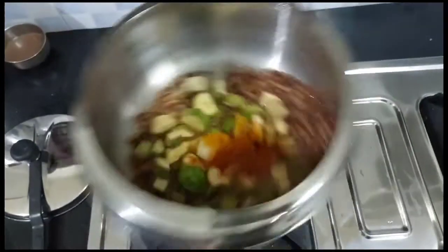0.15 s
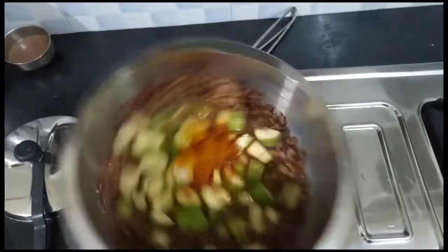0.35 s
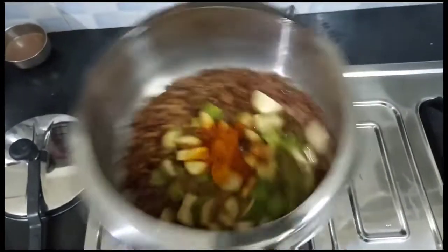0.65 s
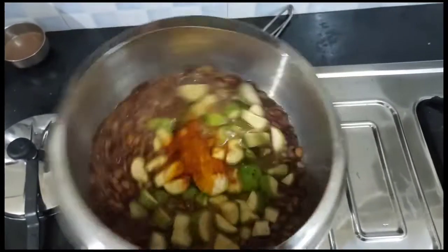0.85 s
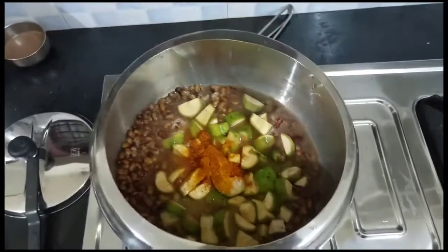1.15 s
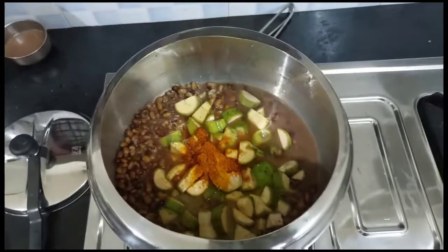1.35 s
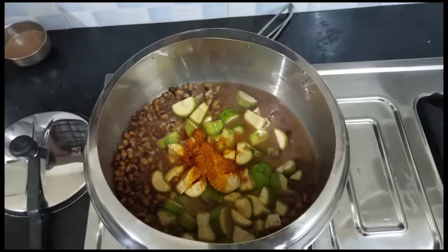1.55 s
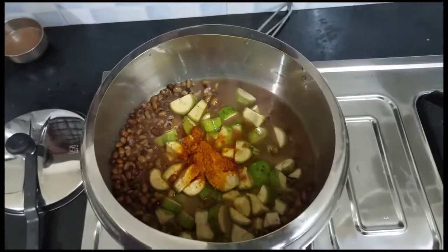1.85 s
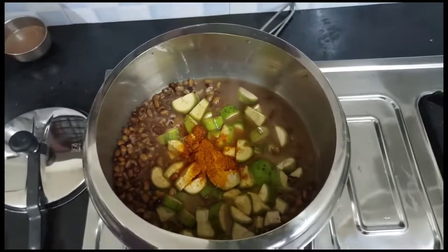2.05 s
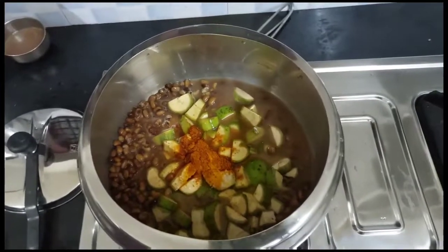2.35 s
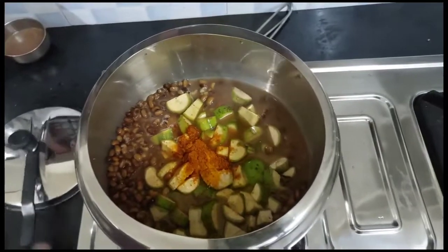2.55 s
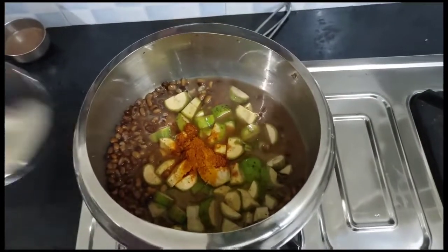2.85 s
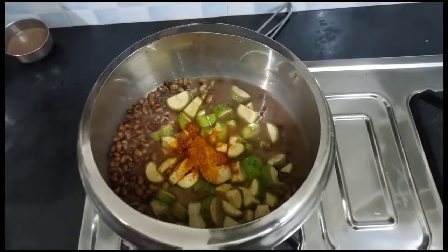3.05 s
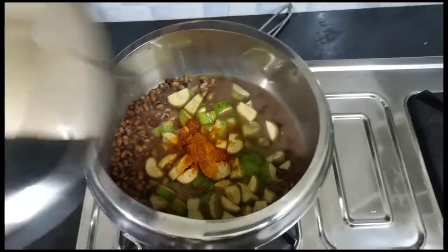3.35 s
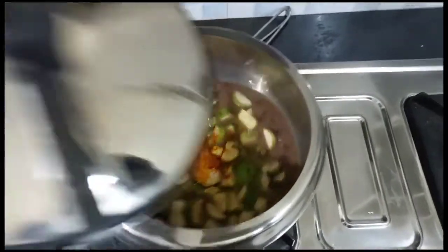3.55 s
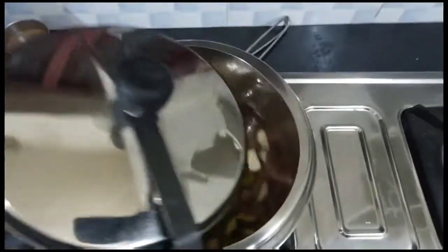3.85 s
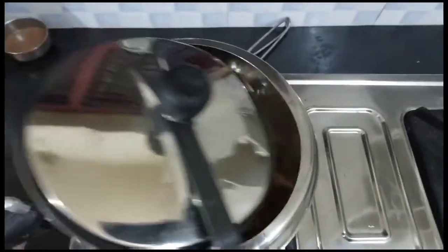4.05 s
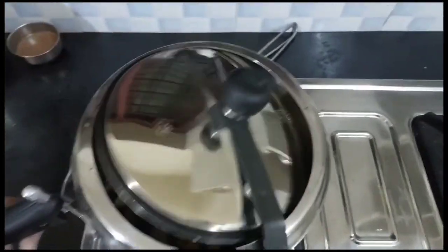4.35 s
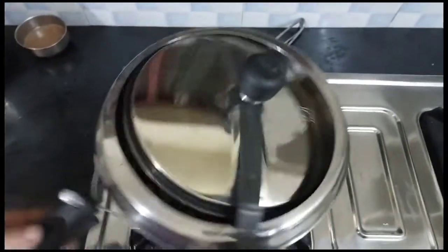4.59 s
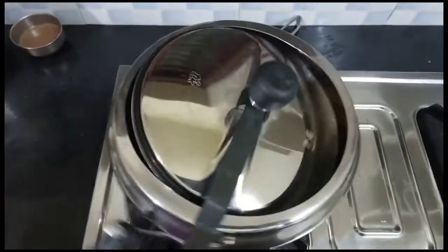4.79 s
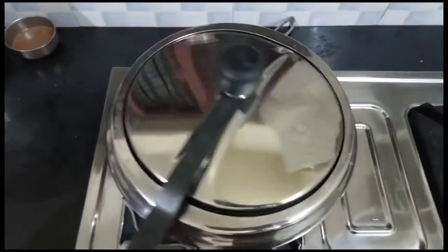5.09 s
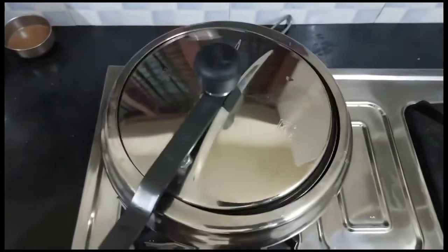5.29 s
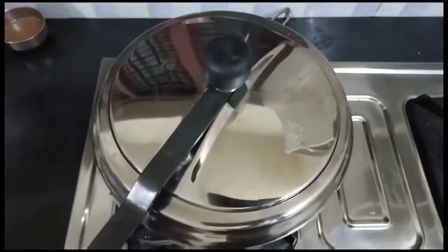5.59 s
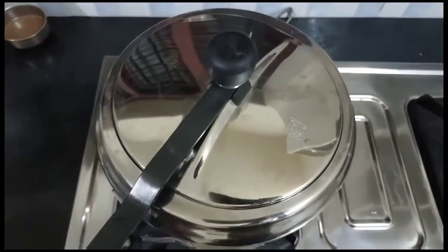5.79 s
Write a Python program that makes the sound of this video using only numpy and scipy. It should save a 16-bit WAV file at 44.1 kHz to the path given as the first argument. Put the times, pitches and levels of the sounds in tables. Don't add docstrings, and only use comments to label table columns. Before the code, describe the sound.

Close kitchen metal sounds: soft bean swish, heavy pot knocks, bright lid scraping, a short high squeak, then hard ringing clatters as the lid locks.

```python
import sys
import numpy as np
from scipy import signal
from scipy.fft import rfft, irfft
from scipy.io import wavfile
from scipy.ndimage import uniform_filter1d

SR = 44100
rng = np.random.default_rng(int(sys.argv[2]) if len(sys.argv) > 2 else 0)


def natural_amplitude(level_db):
    exponent = np.asarray(level_db, float) / 20
    return 10 ** exponent


def waveform_to_disk(signal):
    frames = np.transpose(np.atleast_2d(signal))
    scaled = np.clip(frames, -1, 1) * 32767
    samples = np.round(scaled).astype(np.int16)
    wavfile.write(sys.argv[1], SR, samples)


N = 261326

BANDS_HZ = [130, 500, 2000, 7500]
BOOM_PER_WEIGHT = 0.93


def read(points, hz):
    f, value = np.transpose(points)
    return np.interp(np.log(hz + 1), np.log(f + 1), value)


def evened(x):
    return x / np.sqrt(np.mean(x ** 2) + 1e-20)


def shares(hz):
    return np.array([read(list(zip(BANDS_HZ, row)), hz) for row in np.eye(len(BANDS_HZ))])


def left_port(hz):
    # (frequency [Hz], level [dB])
    louder_left = [(60, -4.5), (240, 1.5), (950, 1), (3770, -6), (15000, 1)]
    right_lag = 11
    return natural_amplitude(read(louder_left, hz)) * np.exp(2j * np.pi * hz * right_lag / SR)


def port_noise(colour, size):
    # (frequency [Hz], likeness [0 to 1])
    likeness = [(60, 0.94), (400, 1), (1300, 0.11), (5000, 0.23), (15000, 0.2)]
    hz = np.fft.rfftfreq(size, 1 / SR)
    right, other = rfft(rng.standard_normal((2, size)))
    same = np.clip(read(likeness, hz), 0, 1)
    left = (same * right + np.sqrt(1 - same ** 2) * other) * left_port(hz)
    return np.array([left, right]) * natural_amplitude(read(colour, hz)), hz


def pressure(t, contact, voice):
    blow_boom_db, boom_db, sizzle_db, low_fade, sizzle_fade = voice
    power = np.zeros((len(BANDS_HZ), len(t)))
    for at, rise, db, fade_db, weight_db in contact:
        tone_db = np.array([boom_db + BOOM_PER_WEIGHT * weight_db, weight_db, 0, sizzle_db])
        fading = abs(fade_db) * np.maximum(t - at - rise, 0)
        slack_db = np.outer([low_fade, low_fade, 1, sizzle_fade], fading)
        build_up = np.clip((t - at) / abs(rise), 0, 1)
        power += (build_up * natural_amplitude(db + tone_db[:, None] - slack_db)) ** 2
    return np.sqrt(power)


def chatter(count, per_s, spread_db):
    strength = natural_amplitude(spread_db * np.minimum(rng.exponential(1, count), 2.6))
    size = strength * rng.choice([-1, 1], count)
    return evened(size * (rng.random(count) < per_s / SR))


def shimmer(drive, colour, t60, crack, bunch_db):
    count = drive.shape[2]
    age = np.arange(10240) / SR
    cracking = crack * (natural_amplitude(-60 * age / 0.015) + natural_amplitude(-60 * age / 0.0013))
    out = np.zeros((2, count))
    spot = rng.integers(0, 3, count)
    for k, here in np.ndindex(len(BANDS_HZ), 3):
        z, hz = port_noise(colour, size=len(age))
        bunches = evened(uniform_filter1d(rng.standard_normal(len(hz)), size=18))
        z = z * natural_amplitude(bunch_db * bunches)
        rise = 1 - np.exp(-age * BANDS_HZ[k])
        tail = irfft(z * shares(hz)[k]) * (natural_amplitude(-60 * age / t60[k]) + cracking) * rise
        tail = tail / np.linalg.norm(tail[1])
        out += signal.fftconvolve(drive[:, k] * (spot == here), tail, axes=1)[:, :count]
    return out


def clear_modes(drive, modes, ring_db):
    count = drive.shape[2]
    place = natural_amplitude(3.37 * rng.standard_normal(count)) * rng.choice([-1, 1], count)
    both = np.array([place, place[::-1]])
    out = np.zeros((2, count))
    for hz, db, t60 in modes:
        pole = np.exp(2j * np.pi * hz / SR - np.log(1000) / (min(t60, .9) * SR))
        same = np.exp(-hz / 2500)
        mixing = np.array([[same, np.sqrt(1 - same ** 2)], [1, 0]])
        push = np.tensordot(shares(hz), drive, (0, 1))
        push = push * np.roll(mixing @ both, rng.integers(count), axis=1)
        turn = np.array([[left_port(hz) * np.exp(1j * rng.normal(0, hz / 3000))], [1]])
        ringing = (turn * signal.lfilter([1], [1, -pole], push)).imag
        out += natural_amplitude(ring_db + db) * np.sqrt(1 - abs(pole) ** 2) * ringing
    return out


def struck_object(span, voice, blows, contact, colour, modes, t60, blow_db, contact_db, ring_db,
                  per_s, spread_db, crack, bunch_db):
    start = round(span[0] * SR)
    count = min(round(span[1] * SR) + SR // 2, N) - start
    t = (start + np.arange(count)) / SR
    touching = t < span[1]
    rub = pressure(t, contact, voice) * touching * chatter(count, per_s, spread_db)
    drive = natural_amplitude(contact_db) * np.array([rub, rub])
    for at, db, weight, sharp, pan in blows:
        tone_db = np.array([voice[0] + BOOM_PER_WEIGHT * weight, weight, 0, sharp])
        force = natural_amplitude(blow_db + db + tone_db)
        drive[:, :, max(round(at * SR) - start, 0)] += np.outer(natural_amplitude([pan / 2, -pan / 2]), force)
    out = np.zeros((2, N))
    out[:, start:start + count] = shimmer(drive, colour, t60, crack, bunch_db)
    out[:, start:start + count] += clear_modes(drive, modes, ring_db)
    return out


def rings(rows):
    out = np.zeros((2, N))
    age = np.arange(SR // 2) / SR
    for (at, hz, db, t60), chance in zip(rows, rng.random((len(rows), 7))):
        apart_hz = (chance[1:4, None] - .5) * (16 + hz * 0.0306)
        beat = 1 + 0.59 * np.exp(2j * np.pi * (apart_hz * age + chance[4:, None])).sum(0)
        fade = natural_amplitude(db - 60 * age / t60) * (1 - np.exp(-age / 0.0016))
        tone = fade * beat * np.exp(2j * np.pi * hz * age)
        turn = np.array([[left_port(hz) * np.exp(1j * (chance[0] - .5) * hz / 900)], [1]])
        part = out[:, round(at * SR):][:, :len(age)]
        part += (turn * tone).imag[:, :part.shape[1]]
    return out


def kitchen_hush():
    # (frequency [Hz], level [dB per Hz])
    hush_colour = [(12, -63), (24, -6), (107, -2.5), (158, -21.5), (262, -17.5), (500, -36), (2530, -30.5),
                   (16000, -30.5)]
    noise = irfft(port_noise(hush_colour, size=2 ** 18)[0])[:, :N]
    return natural_amplitude(-72) * evened(noise)


def swirled_beans():
    # (time [s], force [dB], weight [dB], sharpness [dB], left-right [dB])
    blows = [
        (0.139, -52, -24, 10, 2),
        (0.203, -49.5, -27, 6, -4),
        (0.5527, -61.5, -21, 22, 4),
        (0.769, -70, -9, 16, -9),
        (0.81, -66, 3, 17, -3),
    ]
    # (start [s], build-up [s], peak [dB], fade [dB per s], weight [dB])
    contact = [
        (0.0, 0.00053, -71, 30, -3.5),
        (.12, 0.085, -72.5, 94, -27),
        (.36, .14, -71.5, 30, -6.5),
        (.78, 0.12, -77, 90, -10),
        (.98, 0.03, -77.5, 293, -8),
    ]
    # (frequency [Hz], level [dB per Hz])
    colour = [(24, -34), (40, 12), (364, -27.5), (1170, -17), (1490, -21), (1730, -17), (2450, -15),
              (4910, -18), (15000, -43)]
    # (frequency [Hz], level [dB], 60 dB decay time [s])
    modes = [(4630, -10, .02)]
    # (blow boom [dB], scrape boom [dB], scrape sizzle [dB], fade in lows [share], in sizzle [share])
    voice = (-3, 3.5, 11.5, 0.7, 1.1)
    # (time [s], frequency [Hz], level [dB], 60 dB decay time [s])
    lone_rings = [(.14, 4880, -60, 0.2), (.14, 4540, -49, 0.044), (.14, 5170, -56, .04),
                  (.246, 1157, -66.5, 0.21), (.246, 1720, -57, 0.33), (.66, 1180, -76, .3),
                  (.72, 1280, -77, 1.4), (.9, 2070, -76, 0.87), (.905, 3800, -62, 0.12),
                  (.94, 860, -79, 0.54), (.1, 1260, -75, 1.2)]
    return rings(lone_rings) + struck_object(
        (0, 1.271), voice, blows, contact, colour, modes, t60=[0.042, 0.34, 0.6, 0.13],
        blow_db=12, contact_db=-1, ring_db=-12, per_s=3000, spread_db=3.0, crack=2.5, bunch_db=3.0)


def landing_pot():
    # (time [s], force [dB], weight [dB], sharpness [dB], left-right [dB])
    blows = [(1.2933, -27, -1, -8, 0), (1.4184, -19, -7, -8, 3.5), (1.49, -25, -2.5, -11, 0),
             (1.544, -21.5, -3.5, -3.5, 0), (1.7566, -47.5, 16.5, -35, 0.5), (1.8707, -25.5, -3, -7.5, 1.5),
             (1.9295, -27.5, -5, -8, 0), (1.574, -25.5, -4, -10, -1), (2.065, -51.5, 12.5, 8, 1),
             (2.09, -56.5, -4, 14, 1), (2.11, -55.5, 6, 2, -3.5)]
    # (start [s], build-up [s], peak [dB], fade [dB per s], weight [dB])
    contact = [
        (1.29, 0.019, -26, 175, -1),
        (1.409, 0.0039, -26.5, 67, -1),
        (1.45, 0.078, -35, 97, -5),
        (1.864, 0.022, -31, 96, -2),
        (2.1, 0.14, -58, 400, 3.5),
        (2.28, 0.094, -61.5, 60, -9),
    ]
    # (frequency [Hz], level [dB per Hz])
    colour = [(24, -34), (40, -11), (160, -15), (239, -3), (454, -9.5), (888, -7), (2170, -6), (4560, -16),
              (15000, -49.5)]
    # (frequency [Hz], level [dB], 60 dB decay time [s])
    modes = [(102, -0.5, 1), (227.4, 3.5, 0.2), (281.6, 0.5, 0.19), (332, 2, 0.13), (409, -3, 0.7),
             (670, -2, 0.12), (886, -2.5, 0.12), (2387, -1.5, 0.046)]
    # (blow boom [dB], scrape boom [dB], scrape sizzle [dB], fade in lows [share], in sizzle [share])
    voice = (-13, -4.5, -4.5, 0.76, 1.05)
    # (time [s], frequency [Hz], level [dB], 60 dB decay time [s])
    lone_rings = [(1.294, 925, -54, .4), (1.49, 95.3, -36.5, 1.3), (1.87, 289, -37.5, 0.74),
                  (2.31, 4500, -73, 0.3), (2.37, 1090, -73, 0.95), (2.39, 4020, -71, 0.45),
                  (2.41, 4130, -70, .5), (2.46, 4230, -73, 0.58), (3.95, 671, -38, 0.27),
                  (5.546, 97.5, -29, 0.81), (5.546, 187.7, -30.5, 0.36)]
    return rings(lone_rings) + struck_object(
        (1.29, 2.5), voice, blows, contact, colour, modes, t60=[0.26, 0.3, 0.45, 0.36],
        blow_db=22, contact_db=-4, ring_db=-7, per_s=400, spread_db=4.5, crack=.9, bunch_db=2.5)


def dragged_lid():
    # (time [s], force [dB], weight [dB], sharpness [dB], left-right [dB])
    blows = [
        (2.5402, -36, -18, -24, -4),
        (2.628, -34, -8, -10, 5),
        (2.912, -52, -21, 4, 0),
        (3.072, -41, -18, -8.5, 3),
        (2.7828, -40, -3, -30, -20),
        (2.943, -44.5, -17, 0, -1),
        (3.053, -39, -22, -8, 2),
        (3.15, -31, -17, -1, 1),
        (3.2389, -38.5, -31, -0.5, 3),
        (3.2558, -44, -31, -3, -9),
    ]
    # (start [s], build-up [s], peak [dB], fade [dB per s], weight [dB])
    contact = [
        (2.524, 0.017, -40.5, 22, -11.5),
        (2.589, 0.059, -32, 100, -5.5),
        (2.75, 0.05, -47, 240, -10),
        (2.9, 0.08, -51.5, 370, -22),
        (3.045, 0.022, -48.5, 480, -15),
        (3.14, 0.032, -48, 180, -30),
        (3.24, 0.084, -54, 540, -5),
        (3.43, 0.041, -69.5, 10, 5.5),
    ]
    # (frequency [Hz], level [dB per Hz])
    colour = [(35, -40), (80, -28), (400, -24.5), (900, -18), (1450, -7), (2550, 3.5), (3150, -1),
              (4800, 0), (5800, -7.5), (15000, -26)]
    # (frequency [Hz], level [dB], 60 dB decay time [s])
    modes = [(192, -12, .3), (1180, -3, .2), (1495, 0, .25), (1955, -1, .2), (2450, 0, .1), (2620, -2, .12),
             (2890, -3, .14), (3470, -3, .15), (3880, -4, .12), (4320, -5, .1), (4780, -2, .08),
             (5240, -6, .12)]
    # (blow boom [dB], scrape boom [dB], scrape sizzle [dB], fade in lows [share], in sizzle [share])
    voice = (-33, -12, 5.5, 0.95, 2)
    # (time [s], frequency [Hz], level [dB], 60 dB decay time [s])
    lone_rings = [(2.54, 1393, -46, 0.39), (2.63, 396.5, -39, 0.13), (2.645, 420, -38.5, .15),
                  (2.545, 470, -57, .3), (2.58, 400, -51.5, 0.27), (3.06, 640, -72, 0.51),
                  (3.32, 510, -62, 0.27), (3.152, 2700, -36, .06), (3.152, 1050, -53.5, 0.28),
                  (2.64, 190, -46.5, .4), (3.07, 1100, -54, 0.2), (3.054, 2600, -44, 0.1),
                  (3.054, 4900, -46, 0.14), (3.24, 2400, -48.5, 0.36), (3.24, 4800, -47, 0.13)]
    return rings(lone_rings) + struck_object(
        (2.52, 3.48), voice, blows, contact, colour, modes, t60=[0.12, 0.56, 0.39, 0.27],
        blow_db=21, contact_db=-3, ring_db=-5, per_s=1300, spread_db=3.5, crack=2.1, bunch_db=3.0)


def air_under_lid():
    # (time [s], frequency [Hz], level [dB])
    air_pocket = [
        (2.659, 473, -57),
        (2.711, 579, -48),
        (2.773, 647, -46.5),
        (2.86, 702, -53),
        (2.98, 706, -89),
    ]
    s, hz, db = np.transpose(air_pocket)
    t = np.arange(N) / SR
    blur = np.exp(-np.pi * 170 / SR)
    noise = rng.standard_normal(N) + 1j * rng.standard_normal(N)
    fuzz = signal.lfilter([1], [1, -2 * blur, blur ** 2], noise)
    turn = 2 * np.pi * np.cumsum(np.interp(t, s, hz)) / SR
    tone = evened((fuzz * np.exp(1j * turn)).real)
    return tone * natural_amplitude(np.interp(t, s, db, -150, -150))


def shoved_pot():
    # (time [s], force [dB], weight [dB], sharpness [dB], left-right [dB])
    blows = [
        (3.4939, -28, -6.5, -12.5, -0.5),
        (3.5587, -24, -2, -14, -2.5),
        (3.628, -31, 2.5, -20, 1),
        (3.646, -31.5, 1.5, -20, 0),
        (3.6802, -20.5, -5, -12.5, 1),
    ]
    # (start [s], build-up [s], peak [dB], fade [dB per s], weight [dB])
    contact = [
        (3.49, 0.017, -31, 54.3, -1.5),
        (3.68, 0.025, -32, 48, -4),
        (3.9, 0.027, -47.5, 60, 6),
    ]
    # (frequency [Hz], level [dB per Hz])
    colour = [(24, -39), (40, -1), (138, -9.5), (306, -3.5), (454, -11), (659, -3.5), (1690, -9.5),
              (4340, -14), (15000, -39.5)]
    # (frequency [Hz], level [dB], 60 dB decay time [s])
    modes = [(239, 3.5, 0.11), (327, 1.5, 0.054), (642, -6, 0.1), (1870, -17, 0.12), (2010, -17, 0.67)]
    # (blow boom [dB], scrape boom [dB], scrape sizzle [dB], fade in lows [share], in sizzle [share])
    voice = (-9.5, -9, -17, 0.9, 0.33)
    return struck_object(
        (3.49, 4.12), voice, blows, contact, colour, modes, t60=[0.17, 0.19, 0.33, 0.64],
        blow_db=22, contact_db=-4, ring_db=-6, per_s=500, spread_db=4.5, crack=.9, bunch_db=1.8)


def rim_squeal():
    # (centre [s], half length [s], pitch [Hz], peak [dB])
    swells = [
        (4.058, 0.023, 3754, -22.5),
        (4.111, 0.026, 3740, -18.5),
        (4.182, 0.017, 3744, -30.5),
        (4.232, 0.023, 3750, -32.5),
        (4.33, 0.097, 3840, -49),
    ]
    # (multiple of the pitch [number], level [dB])
    overtones = [
        (2, -23.5),
        (3, -47),
    ]
    s, half, hz, db = np.transpose(swells)
    t = np.arange(N) / SR
    power = sum(natural_amplitude(2 * d) * np.exp(-2 * abs((t - at) / h) ** 2.4) for at, h, d in zip(s, half, db))
    level = np.sqrt(power)
    turn = 2 * np.pi * np.cumsum(np.interp(t, s, hz)) / SR
    turn = turn - np.array([[2.1], [0]])
    tone = np.sin(turn)
    for multiple, d in overtones:
        tone = tone + natural_amplitude(d) * level / level.max() * np.sin(multiple * turn)
    return tone * level * natural_amplitude([[1.1], [5.0]])


def lid_on_rim():
    # (time [s], force [dB], weight [dB], sharpness [dB], left-right [dB])
    blows = [(4.1239, -20.5, -4, -18, 8.5), (4.1401, -34.5, -5, -15, -18), (4.259, -22, -5.5, -11, 1),
             (4.3977, -15.5, -7, -5.5, 7), (4.4194, -20, -7, -6.5, -10), (4.4878, -18, -5, -4.5, 2.5),
             (4.5309, -21, -16, -11, -3.5), (4.6779, -24, -24, -8, 4.5), (4.7054, -30, -17, -3.5, -1),
             (4.69, -39, -15, -5, 0), (4.722, -32.5, -13, -5, 0), (4.763, -31, -6.5, -4.5, 0),
             (4.7498, -30, -3.5, -10, 1), (5.124, -43, 1, -10, 3), (5.1347, -16, -7.5, -7, 3.5),
             (5.22, -21.5, -3.5, -2, 0), (5.602, -28, -4, -9, -1), (5.2052, -23.5, 1.5, 6.5, 3),
             (5.2489, -18.5, -3.5, -1, 3), (5.3298, -29, -4.5, -0.5, -3), (5.5424, -24.5, -4, -0.5, 5),
             (5.5789, -24.5, -18, -5, -9), (5.8606, -43.5, -13, -3.5, 1), (5.915, -48.5, -16, 4, 1)]
    # (start [s], build-up [s], peak [dB], fade [dB per s], weight [dB])
    contact = [
        (4.121, 0.0085, -27.5, 102, -3.5),
        (4.397, 0.019, -25, 60, -9),
        (4.62, 0.058, -41, 30.93, 2.5),
        (4.85, 0.1, -39.5, 163, -0.5),
        (5.117, 0.0053, -37, 90, 0),
        (5.172, 0.049, -22.5, 73, -6),
        (5.529, 0.036, -18.5, 136, -10.5),
    ]
    # (frequency [Hz], level [dB per Hz])
    colour = [(24, -42), (40, -24.5), (150, -14.5), (390, -2), (900, -7), (1700, -10.5), (3150, -11.5),
              (4200, -5.5), (15000, -28.5)]
    # (frequency [Hz], level [dB], 60 dB decay time [s])
    modes = [(96, -6, .9), (232, -3, .3), (390, -4, .2), (664, -7, .15), (873, -11, .2), (1100, -7, .2),
             (1272, -4, .25), (1810, -6, .18), (2735, -10, .15), (2882, -10, .15), (3688, -11, .2),
             (4414, -12, .18), (4873, -12, .2), (6022, -13, .2)]
    # (frequency [Hz], level [dB], 60 dB decay time [s])
    top_modes = [(1900, -11, 0.19), (3455, -10, .2), (3920, -10, 0.37), (4180, -12, 0.3), (5250, -12, 0.32),
                 (6720, -15, 0.27), (7160, -14, .15), (8075, -20, .15), (8900, -25, .2), (10450, -21, .2)]
    # (blow boom [dB], scrape boom [dB], scrape sizzle [dB], fade in lows [share], in sizzle [share])
    voice = (-27, -3.5, -4.5, 0.76, 1.4)
    # (time [s], frequency [Hz], level [dB], 60 dB decay time [s])
    lone_rings = [(4.1225, 624, -13, 0.019), (4.124, 1098, -29.5, 0.27), (4.126, 2720, -35, 0.28),
                  (4.2565, 693, -19, 0.026), (4.226, 400, -32.5, 0.069), (4.141, 4630, -30, 0.09),
                  (4.534, 357, -24.5, 0.067), (4.258, 2745, -37, 0.28), (4.257, 3980, -27, 0.14),
                  (4.397, 379, -30, 0.17), (4.397, 1840, -29, 0.32), (4.41, 3850, -29, 0.25),
                  (4.489, 359, -41, 0.63), (4.49, 1850, -15.5, 0.095), (4.49, 3760, -30, 0.26),
                  (4.49, 4180, -32, .2), (4.699, 1265, -39.5, 0.45), (4.932, 1040, -41, 0.47),
                  (5.135, 330.6, -39.5, 0.93), (5.135, 1930, -49, 0.46), (5.205, 1008, -25, 0.23),
                  (5.251, 2700, -28.5, 0.42), (5.546, 114, -30, 0.74)]
    # (time [s], frequency [Hz], level [dB], 60 dB decay
    # time [s])
    clack_rings = [(4.398, 1260, -30, .5), (4.398, 2713, -32.5, .5), (4.398, 3688, -33.5, .5),
                   (4.398, 4414, -33, 0.55), (4.398, 6665, -40, .25), (4.398, 9076, -42, .14),
                   (4.398, 1000, -21, 0.047), (5.135, 1265, -33, .3), (5.135, 2891, -41, .4),
                   (5.135, 3461, -36, 0.16), (5.135, 3500, -39, .15), (5.135, 6900, -39, .09),
                   (5.135, 5200, -44, .06), (5.206, 5300, -33, 0.48), (5.206, 6019, -38, .2),
                   (5.206, 7160, -38, .2), (5.24, 1276, -27, .5), (5.248, 259, -27.5, 0.28),
                   (5.206, 4600, -41, .4), (5.58, 3100, -28, .2), (5.55, 4345, -33, .3),
                   (5.55, 3390, -33, .3), (4.68, 4000, -46, .4), (2.3, 6400, -68, .06),
                   (1.46, 872, -31, .15)]
    return rings(lone_rings + clack_rings) + struck_object(
        (4.12, 5.925), voice, blows, contact, colour, modes + top_modes, t60=[0.35, 0.16, 0.49, 0.38],
        blow_db=22, contact_db=-7, ring_db=0, per_s=350, spread_db=4.5, crack=1.6, bunch_db=4.5)


def scene():
    mix = kitchen_hush()
    mix += swirled_beans()
    mix += landing_pot()
    mix += dragged_lid()
    mix += air_under_lid()
    mix += shoved_pot()
    mix += rim_squeal()
    mix += lid_on_rim()
    return mix


def band_limit(x):
    return signal.sosfilt(signal.butter(12, 16670, fs=SR, output="sos"), x)


def record(dry):
    # (frequency [Hz], level [dB])
    microphone = [(25, -13), (50, -2.5), (7300, 2.5), (8400, -5), (9800, 0.5), (12500, 2.5), (15100, 0),
                  (15450, -28), (16000, -46)]
    hz = np.linspace(0, SR / 2, num=2049)
    colour = signal.firwin2(4095, hz, natural_amplitude(read(microphone, hz)), fs=SR)
    mix = signal.oaconvolve(dry, colour[None], "same")
    return band_limit(mix)


dry = scene()
out = record(dry)
waveform_to_disk(out)
```